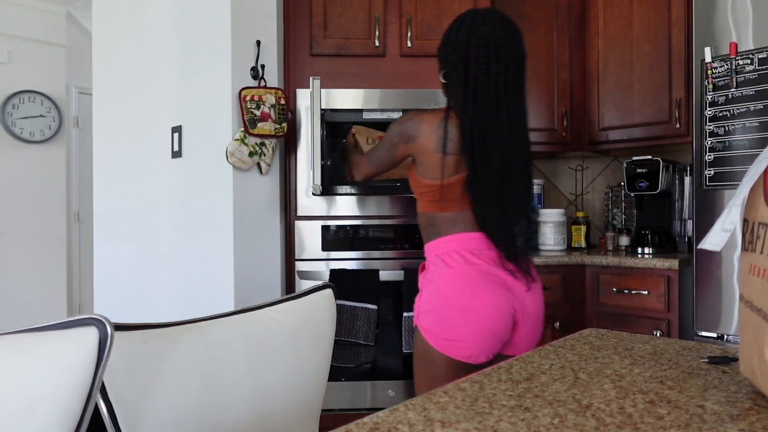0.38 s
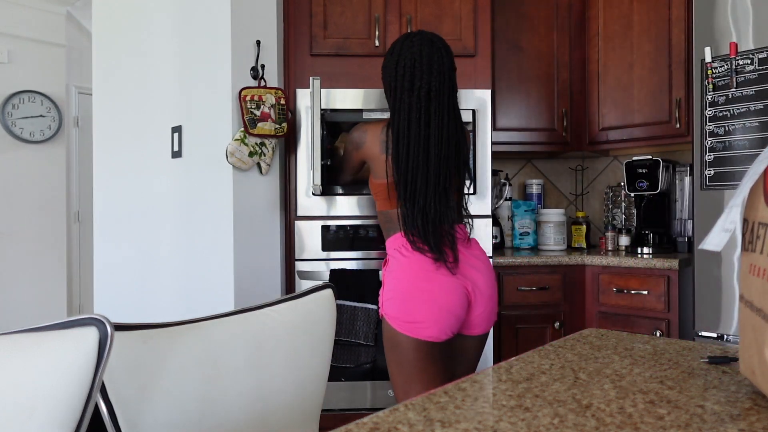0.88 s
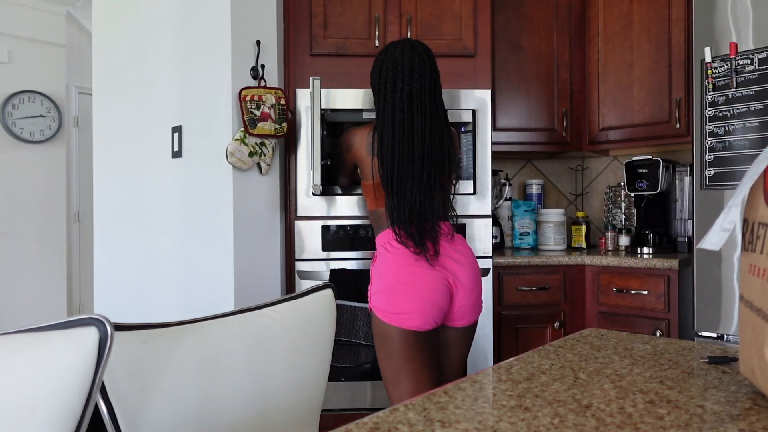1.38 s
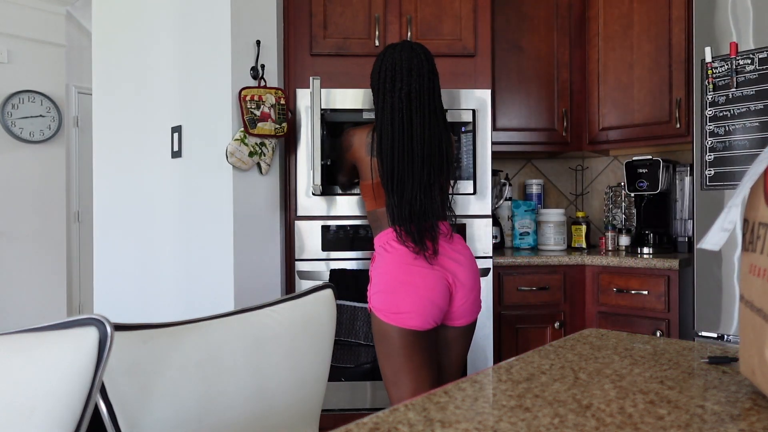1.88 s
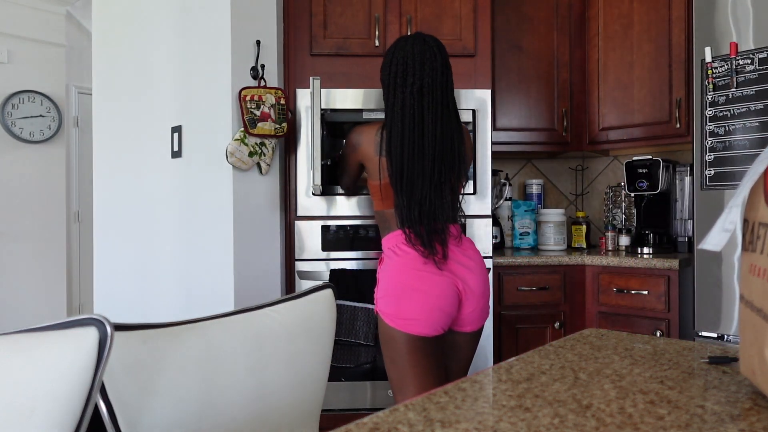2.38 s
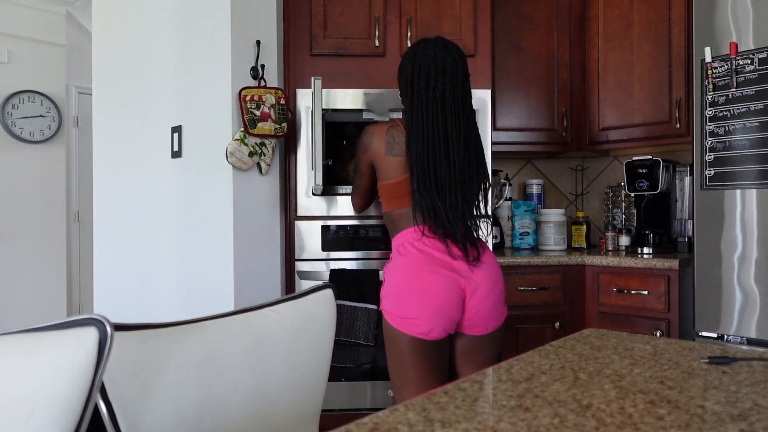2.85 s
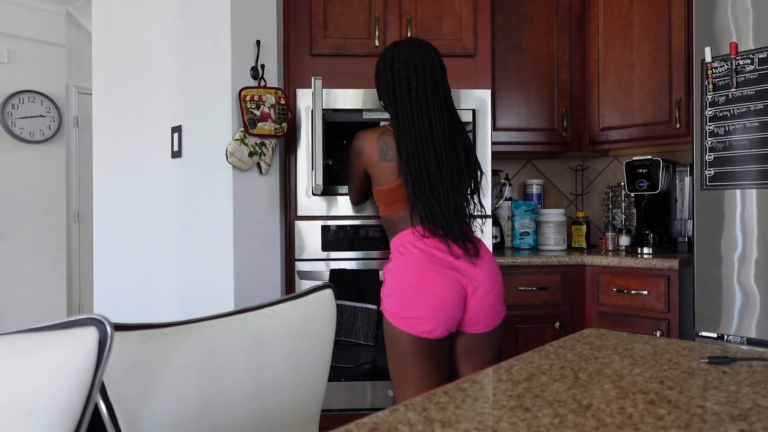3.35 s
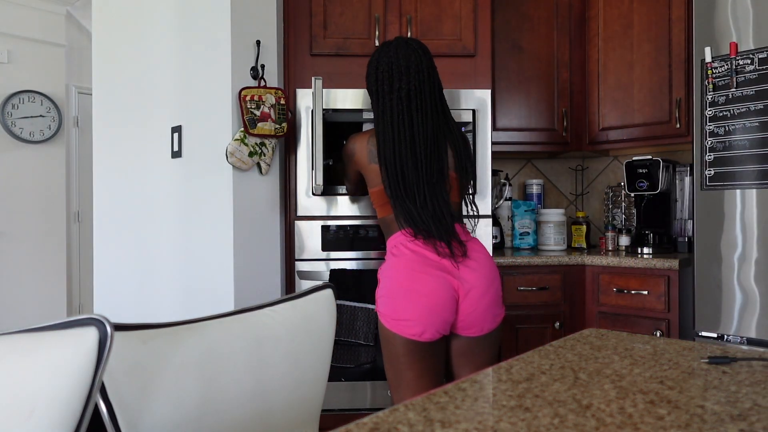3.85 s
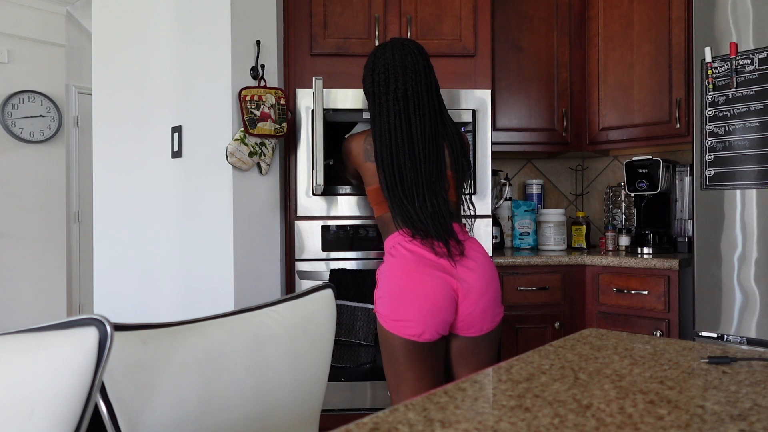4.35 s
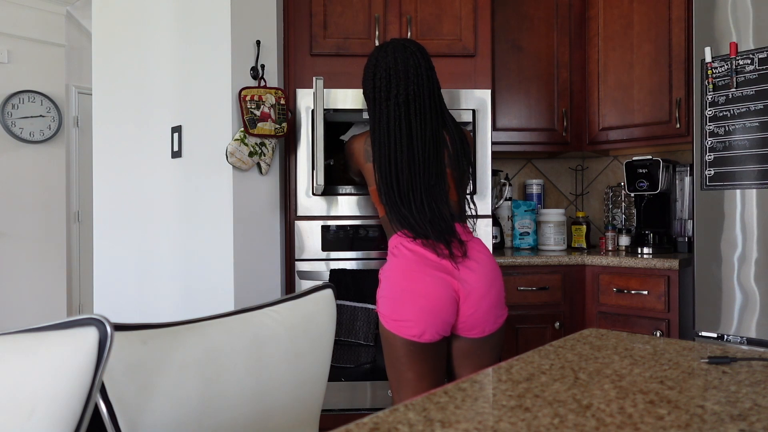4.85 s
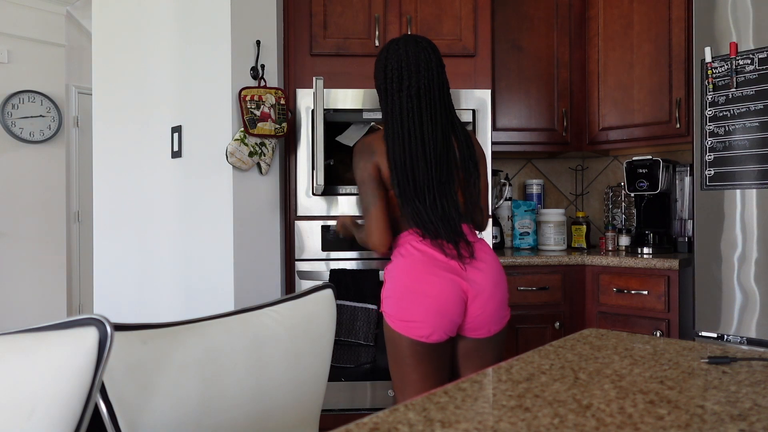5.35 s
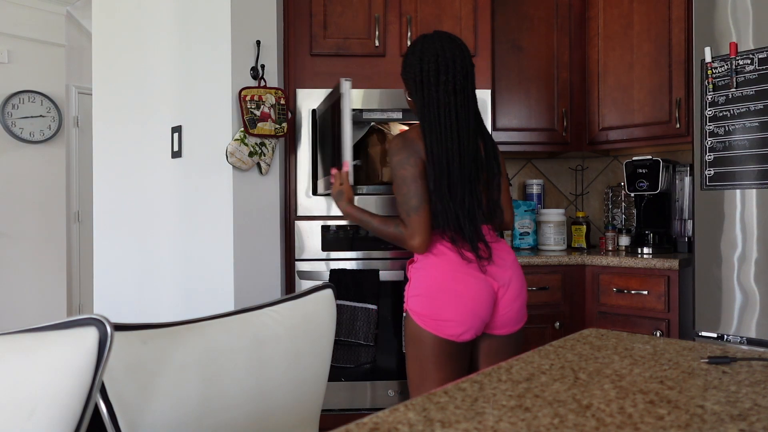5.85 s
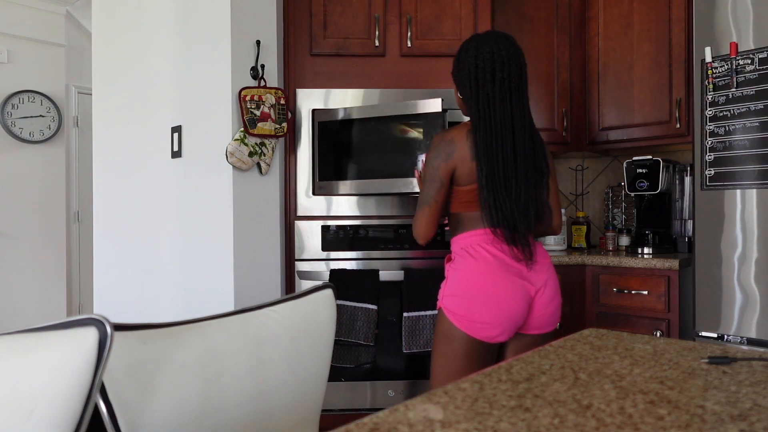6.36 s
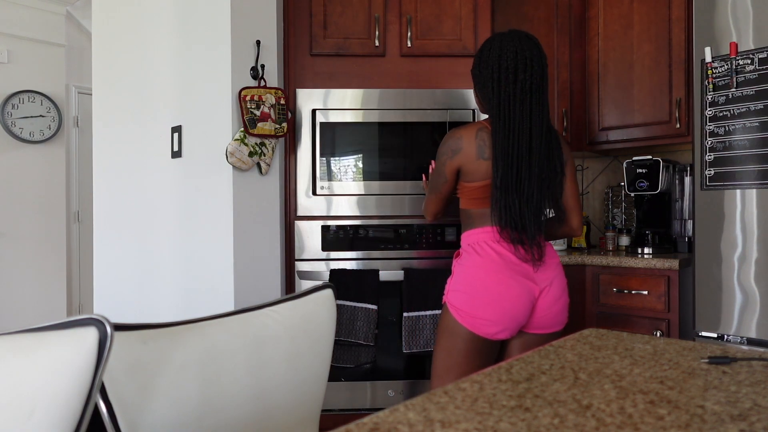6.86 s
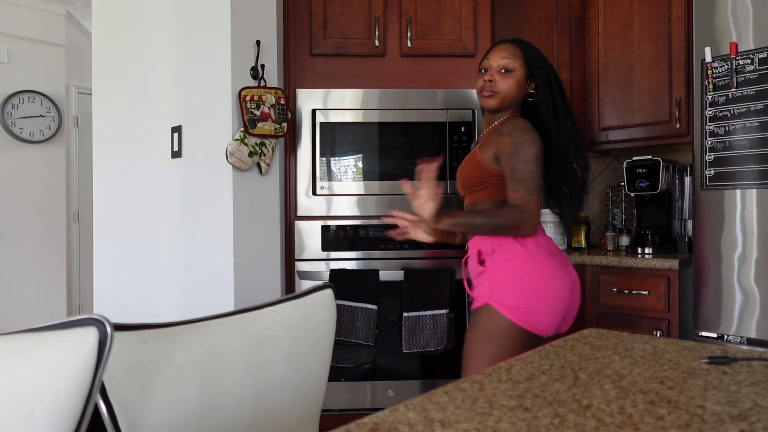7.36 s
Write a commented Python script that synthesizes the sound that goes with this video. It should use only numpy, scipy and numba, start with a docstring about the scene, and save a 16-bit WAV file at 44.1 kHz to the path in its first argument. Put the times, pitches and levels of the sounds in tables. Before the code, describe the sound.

In a hard, reverberant kitchen, paper bags and cartons are pushed about inside a microwave. Rustling and crackling come in uneven bursts, with dull cardboard pops and sharp crease snaps, loudest in the middle. The handling thins to small ticks, then nearly stops. The oven door slams and rattles briefly, its echo fading into soft room tone. Stereo microphone a few metres away.

```python
"""Long rustling and many snaps of creases: paper bags and cartons are pushed about inside a small oven.
The oven stands across a hard kitchen; near the end its door is slammed and rattles on.
Rustle, snaps and door are random clicks shaped in time and spectrum, over a steady room tone.
Decaying noise gives the answers of steel cavity and room; gain control holds down the loudest moments."""
import sys
import numpy as np
from scipy import signal
from scipy.fft import rfft, irfft, next_fast_len
from scipy.io import wavfile
from scipy.ndimage import uniform_filter1d, map_coordinates
from numba import njit

SR = 44100
rng = np.random.default_rng(int(sys.argv[2]) if len(sys.argv) > 2 else 0)


def gain_from_db(level_db):
    """Turn a decibel level (scalar or array-like) into a linear amplitude factor."""
    decades = np.asarray(level_db, float) / 20
    return 10 ** decades


def output_pcm(signal):
    """Save a mono or channel-first signal as 16-bit PCM at the path in sys.argv[1].

    Samples are clipped to [-1, 1] before scaling.
    """
    pcm = np.clip(np.atleast_2d(signal).T, -1, 1) * 32767
    wavfile.write(sys.argv[1], SR, np.round(pcm).astype(np.int16))


N = 329868

# Pushes of the hands on the paper. Each row: start in seconds, length in seconds, crease level in dB,
# hollow body in dB above crease, crisp edge in dB above crease.
HAND_PUSHES = [(0.0, 0.017, -22.5, -12, -8.5), (0.185, 0.24, -37, -1.5, -7.5), (0.502, 0.19, -44.5, 0, -4),
               (0.709, 0.28, -31, -2.5, -21), (0.84, 0.11, -28.5, -4.5, -8), (0.986, 0.18, -36, -1.5, -7),
               (1.264, 0.32, -40, 1.5, -6), (1.575, 0.74, -42.5, 0, -1.5), (1.82, .08, -40, -0.5, -6),
               (1.893, 0.23, -40.5, 2, -13), (2.064, 0.11, -30.5, 4, -9), (2.22, 0.11, -44.5, 9.5, -16),
               (2.604, 0.63, -52, -5, 0), (2.878, 0.21, -30, -0.5, -4), (3.114, 0.21, -35, 1, -10),
               (3.336, 0.1, -24, 0, -3), (3.496, 0.26, -35.5, -3, -5.5), (3.65, 0.17, -22.5, 1, -4.5),
               (3.88, 0.25, -35.5, -0.5, -3), (4.074, .14, -27.5, 4, -5), (4.234, 0.087, -27.5, 2, -11),
               (4.353, .2, -30.5, -0.5, -21), (4.662, 0.13, -35, 3.5, -10), (4.804, .13, -18.5, -4, -4.5),
               (4.923, 0.078, -25.5, 1, -14), (5.21, 0.13, -50, 8.5, -14), (5.4, .3, -53, -16, 0.5),
               (5.804, 0.096, -49.5, 9, -19)]
# Clearest snaps of a crease. Each row: start in seconds, level in dB before the layer offsets,
# panel pitch in Hz, edge in dB relative to that level, rise in ms.
CLEAR_SNAPS = [(.048, -25, 1390, -17, 11), (0.1782, -17, 1390, -15, 1.5), (.197, -18, 1184, -17, 4.5),
               (0.2305, -20.5, 1830, -17, 2.3), (0.2622, -17, 1250, -20, 1.1),
               (0.2784, -27, 1970, -21, 2.9), (0.3177, -21, 944, -26, 0.54), (0.3559, -21, 1800, -27, 2.1),
               (0.3808, -23, 2000, -17, 4.1), (0.421, -29, 1200, -20, 3.6), (0.4949, -27, 2050, -12, 2.3),
               (0.6303, -19.5, 1650, -24, 1.4), (.719, -32, 1880, -25, 1.2), (0.7384, -24, 1790, -28, 8.1),
               (.853, -9, 1280, -23, 1.6), (.8819, -12.5, 2000, -20, .6), (0.9164, -13, 2140, -23, 6.9),
               (0.9306, -12.5, 1780, -19, 1.5), (0.9784, -15.5, 2030, -18, 5.4),
               (1.0643, -28, 1760, -8, 12), (1.1129, -26, 1860, -11, 3.1), (1.265, -29, 2910, -13, 2.2),
               (1.2798, -23, 1900, -15, 3.4), (1.3335, -26.5, 1090, -13, 1.3), (1.379, -23, 1044, -12, 2.4),
               (1.4164, -25, 866, -26, 3.6), (1.4615, -24.5, 1050, -13.5, 3.2),
               (1.514, -21.5, 1920, -12, 1.5), (1.6763, -35, 1080, -9, 13), (1.7685, -33, 1570, -21, 1.8),
               (1.9196, -17, 1140, -12.5, 0.36), (1.9813, -25.5, 1070, -26, 3.3),
               (2.0494, -19, 880, -22, .8), (2.1007, -8.5, 2410, -13.5, 4.8), (2.1305, -12, 2200, -21, .9),
               (2.2322, -22.5, 1080, -15, 0.75), (2.273, -21.5, 1120, -21, 5.5),
               (2.2965, -21.5, 1730, -30, 2), (2.637, -39.5, 1710, -27, 2.2),
               (2.887, -22.5, 2070, -12.5, 4.9), (2.9262, -27, 1670, -21, 2.6),
               (2.9867, -18, 3080, -9, 0.96), (3.0574, -17, 1730, -17, 1.1), (3.0792, -15.5, 994, -17, 6.5),
               (3.1759, -20.5, 1910, -22, 7.4), (3.2617, -25, 1950, -20, 5.6), (3.328, -11, 2300, -15, .9),
               (3.3486, -11, 2930, -8, 3.6), (3.365, -16.5, 960, -10, 17), (3.4023, -12.5, 4060, -3.5, 8.5),
               (3.428, -7, 1560, -6, 1.5), (3.437, -13.5, 1020, -11, 7.1), (3.4615, -8.5, 1280, -21, 0.84),
               (3.646, -21, 2070, -9, 2.4), (3.6732, -7.5, 1040, -7, 1.3), (3.726, -10.5, 1900, -9, 1.5),
               (3.7369, -10, 3280, -10.5, 5.6), (3.7637, -6.5, 2750, -11, 7.3),
               (3.7897, -9.5, 1240, -15, 3), (3.9234, -10, 3060, -11, 4.5), (4.0735, -6.5, 523, -23, 2),
               (4.079, -13, 1470, -21, 1.8), (4.1153, -18, 2980, -10, 4.3), (4.1444, -7.5, 956, -18, 3.1),
               (4.224, -12, 1240, -14, 1.8), (4.25, -11, 2280, -22, 0.98), (4.2617, -17, 1610, -1.5, 1.3),
               (4.318, -15.5, 1290, -16, 1.4), (4.326, -12, 1100, -23, 1.4), (4.37, -15.5, 2090, -29, 2.1),
               (4.412, -25, 2440, -26, 1.7), (4.4253, -19.5, 1550, -15, 1), (4.467, -18.5, 1010, -20, 1.1),
               (4.484, -13.5, 4260, -11, 4.2), (4.495, -8, 2910, -8, 6.3), (4.6153, -16, 1960, -19, .9),
               (4.669, -22, 980, -26, 1.5), (4.687, -19.5, 1900, -12, 1.8), (4.7607, -17, 1250, -12, 24),
               (4.789, -4.5, 2100, -6.5, 1.1), (4.8162, -19, 3400, -7, 1.5),
               (4.8582, -4.5, 1900, -5.5, 1.2), (4.9374, -27, 2000, -3, 3.7), (4.958, -18.5, 3180, 0, 11),
               (5.2155, -18, 1145, -34, 1.2), (5.221, -24, 1150, -26, 3), (5.382, -17, 936, -6.5, 1.4),
               (5.386, -10.5, 1940, -10.5, 0.29), (5.4027, -25.5, 1540, -6, 2.6),
               (5.5964, -36, 4180, -5, 4.3), (5.741, -26, 3860, -1.5, 2.1), (5.7479, -27, 4670, 0, 1.1),
               (5.806, -30, 880, -7, 11), (5.8539, -32, 850, -14, 5.7), (5.984, -48, 4470, -16, .9),
               (6.4419, -37.5, 4070, -6, 5.9)]
# Door meets frame, latch and rack rattle. Each row: start in seconds, rattle peak in dB,
# thump in dB above rattle.
DOOR_STRIKES = [(6.657, -13.5, -23), (6.675, -18, -28), (6.693, -16, -14), (6.703, -26, -25),
                (6.73, -13, -35), (6.747, -13, -13), (6.766, -15.5, -24), (6.789, -17.5, -8.5),
                (6.837, -18.5, -15)]
# Relative spectra of the creasing sheet, its hollow body and its crisp edge, of the door's rattle and thump,
# and of the room tone. Each row: frequency in Hz, power density in dB per Hz.
CREASE_SPECTRUM = [(590, -42), (1000, -4), (1630, -5.5), (1910, 5.5), (2570, 2.5), (2970, 3.5), (3690, 2.5),
                   (7500, -15.5), (9750, -31), (16500, -120)]
BODY_SPECTRUM = [(35, -84), (60, -42), (264, -8.5), (306, -11.5), (401, -9.5), (490, -5), (669, -4.5),
                 (924, 1), (1500, 0), (1950, -6), (3300, -120)]
EDGE_SPECTRUM = [(1200, -70), (2900, -12), (5000, 9), (7200, 7.5), (10000, -1), (13800, -7.5),
                 (15500, -11.5)]
RATTLE_SPECTRUM = [(240, -41), (400, -10), (512, 3), (697, 0), (1030, 5.5), (1400, 3.5), (1600, 3.5),
                   (3210, -1.5), (4380, 0.5), (12100, -23.5), (16000, -35)]
THUMP_SPECTRUM = [(18, -66), (30, -27), (96, -20), (237, 1), (290, 1.5), (325, 3), (600, -15), (780, -33),
                  (1320, -120)]
AIR_SPECTRUM = [(18, -70), (30, -27.5), (245, -9.5), (336, -11.5), (666, -5.5), (1070, -4.5), (1220, -2.5),
                (1720, -1), (1960, -2), (2290, -5.5), (4420, -7.5), (14800, -20.5), (16000, -55)]
# Kitchen decay before the scale of each space. Each row: frequency in Hz, time to fall 60 dB in seconds.
KITCHEN_DECAY = [(150, 0.84), (400, 0.69), (1000, 0.75), (2800, 0.63), (7000, 0.57), (14000, 0.55)]
# Balance of the two channels. Each row: frequency in Hz, left over right in dB.
CHANNEL_BALANCE = [(100, 0.5), (250, -0.7), (500, -2), (4400, -2), (8000, -2.5), (10000, -0.5), (11500, -1)]


def rustle():
    """Dense crackling: many small creases yield in clumps, and patches of the sheet change colour in time."""
    clump_db, clumps_per_s, patch_db = 1.65, 70, 1.5
    t = np.arange(N) / SR
    clumps = gain_from_db(clump_db * map_coordinates(rng.standard_normal(600), [t * clumps_per_s]))
    clicks = clumps * crackle(7000, spread_db=3.0, size=N)
    spectrogram = signal.stft(clicks, nperseg=256)[2]
    patches = uniform_filter1d(rng.standard_normal(spectrogram.shape), size=5, axis=0)
    patches = uniform_filter1d(patches, size=9, axis=1)
    patchy = signal.istft(spectrogram * gain_from_db(patch_db * unit(patches)), nperseg=256)[1]
    sheet = unit(patchy[:N])
    crease_gain, body_gain, edge_gain = gain_from_db(pressure_db())
    crease = coloured(crease_gain * sheet, CREASE_SPECTRUM)
    body = coloured(body_gain * sheet, BODY_SPECTRUM)
    return crease + body + coloured(edge_gain * sheet, EDGE_SPECTRUM)


def pressure_db():
    """Powers of overlapping pushes add: each rises, sags while it lasts, then lets go."""
    attack_s, sag_db_per_s, release_db_per_s = 0.0065, 8.5, 172  # the release adds to the sag
    hop = 32  # samples
    start, length, db, body_db, edge_db = np.transpose(HAND_PUSHES)[:, :, None]
    t = np.arange(0, N, hop) / SR - start
    fall_db = sag_db_per_s * np.maximum(t, 0) + release_db_per_s * np.maximum(t - length, 0)
    shape = np.clip(t / attack_s, 0, 1) ** 2 * gain_from_db(-2 * fall_db)  # power
    power = [np.sum(shape * gain_from_db(2 * (db + above)), axis=0) for above in (0, body_db, edge_db)]
    return 10 * np.log10(np.repeat(power, hop, axis=1)[:, :N] + 1e-12)


def snaps():
    """Impulsive buckling: each snap is a swarm of clicks, part of it resonating at its panel's broad pitch."""
    s, db, hz, edge_db, rise_ms = np.hstack([np.transpose(CLEAR_SNAPS), small_snaps()])
    body_db = -7 - 2 * np.log2(hz / 1500)  # higher panels are less hollow
    panels = np.zeros(N + SR)
    for start, level_db, panel_hz, ms in zip(s, db, hz, rise_ms):
        cycles = panel_hz * np.arange(SR // 40) / SR
        ring = np.sin(2 * np.pi * cycles) * cycles ** 2 * gain_from_db(-60 * cycles / 9.5)
        ring = ring / np.linalg.norm(ring)
        clicks = swarm(level_db - 6.0, ms, t60=0.018, per_s=3500)
        sound = signal.fftconvolve(clicks, ring)
        panels[round(start * SR):][:len(sound)] += sound
    crease = coloured(bursts(s, db - 5.0, rise_ms, t60=0.052, per_s=9800), CREASE_SPECTRUM)
    body = coloured(bursts(s, db + body_db, rise_ms, t60=0.033, per_s=3700), BODY_SPECTRUM)
    edge = coloured(bursts(s, db + edge_db, rise_ms, t60=0.034, per_s=5000), EDGE_SPECTRUM)
    return panels[:N] + crease + body + edge


def small_snaps(count=60):
    """Lesser buckling at random moments, its strength following the push under it."""
    s, z = rng.uniform(0, N / SR, count), rng.standard_normal((count, 4))
    rustle_db = pressure_db()[0, (s * SR).astype(int)]
    db = rustle_db + 8.5 + 3 * z[:, 0]
    panel_hz = 1642 * np.exp(0.358 * z[:, 1])
    edge_db = -19.5 + 5 * z[:, 2]
    rise_ms = 1.8 * np.exp(0.67 * z[:, 3])
    return np.array([s, db, panel_hz, edge_db, rise_ms])


def door():
    """Repeated impact: the door strikes its frame; panel, latch and rack chatter on for a moment."""
    s, db, thump_db = np.transpose(DOOR_STRIKES)
    rise_ms = np.full(len(s), 1.3)
    rattle = bursts(s, db, rise_ms, t60=0.29, per_s=13000)
    thump = bursts(s, db + thump_db, rise_ms, t60=0.29, per_s=3600)
    return coloured(rattle, RATTLE_SPECTRUM) + coloured(thump, THUMP_SPECTRUM)


def bursts(times, dbs, rises_ms, t60, per_s):
    """Superposition: one swarm of clicks starts at each time."""
    out = np.zeros(N + SR)
    for s, db, rise_ms in zip(times, dbs, rises_ms):
        out[round(s * SR):][:SR // 8] += swarm(db, rise_ms, t60, per_s)
    return out[:N]


def swarm(db, rise_ms, t60, per_s):
    """Exponential growth and decay of an eighth-second swarm; a slow swell also dies slowly."""
    t = np.arange(SR // 8) / SR
    rise = max(abs(rise_ms), .1) / 1000  # seconds
    shape = (1 - np.exp(-2 * t / rise)) * gain_from_db(-60 * t / (t60 + 5 * rise))
    return gain_from_db(db) * shape / shape.max() * crackle(per_s, spread_db=1.8, size=len(t))


def crackle(per_s, spread_db, size):
    """Random impulses of rms 1, their dB sizes exponentially spread so that a few are far larger."""
    chance, sign, strength = rng.random((3, size))
    sizes = gain_from_db(-spread_db * np.log(1 - strength * .999))
    return unit((chance < per_s / SR) * np.sign(sign - .5) * sizes)


def kitchen(x):
    """Reverberation of two spaces: the steel cavity answers fast, the room slowly."""
    cavity = answer(x, level_db=-4.5, delay_s=.002, alike=.98, t60_scale=.2, seconds=.16, count=200)
    room = answer(x, level_db=-6.0, delay_s=.012, alike=0.96, t60_scale=1.13, seconds=.7, count=240)
    return cavity + room


def answer(x, level_db, delay_s, alike, t60_scale, seconds, count):
    """Convolution with a diffuse echo, new for each of count cross-faded slices so that no fixed tone rings."""
    step = N // count + 1
    out, fade = np.zeros((2, N + 3 * SR)), np.sqrt(np.hanning(2 * step))
    x = np.pad(x, (step, 2 * step))
    shares = np.sqrt([[(1 + alike) / 2], [abs(1 - alike) / 2]])  # alike: correlation of the channels
    for k in range(0, N + step, step):
        mid, side = tail(t60_scale, seconds) * shares
        pair = gain_from_db(level_db) * np.array([mid + side, mid - side])
        echo = signal.fftconvolve((fade * x[k:k + 2 * step])[None], pair, axes=1)
        out[:, k + round(delay_s * SR):][:, :echo.shape[1]] += echo
    return out[:, step:step + N]


def tail(t60_scale, seconds):
    """A diffuse field as decaying noise of about unit energy, each frequency dying at its own speed."""
    hz, t, z = signal.stft(rng.standard_normal((2, int(seconds * SR))), SR, nperseg=256)
    t60 = t60_scale * along(KITCHEN_DECAY, hz)[:, None]
    pair = signal.istft(z * gain_from_db(-60 * t / t60), SR, nperseg=256)[1]
    return pair / np.linalg.norm(pair[0])


def room_tone():
    """Stationary filtered noise: appliance hum and air, largely shared by the two channels."""
    mid, side = coloured(rng.standard_normal((2, N)), AIR_SPECTRUM)
    return gain_from_db(-45.5) * np.array([mid + 0.42 * side, mid - 0.29 * side])


def unit(x):
    """Normalisation of x to rms 1."""
    return x / np.sqrt(np.mean(x ** 2) + 1e-20)


def along(points, hz):
    """Interpolation of (Hz, value) points on a logarithmic frequency axis."""
    f, v = np.transpose(points)
    return np.interp(np.log(hz + 1), np.log(f + 1), v)


def coloured(x, spectrum):
    """Minimum-phase filtering: a causal pulse of unit energy with the given spectrum."""
    size = 4096
    gain = np.maximum(gain_from_db(along(spectrum, np.fft.rfftfreq(size, 1 / SR))), 1e-3)
    cepstrum = irfft(np.log(gain))
    cepstrum[1:size // 2] *= 2  # folding the cepstrum makes the pulse causal
    cepstrum[size // 2 + 1:] = 0
    pulse = irfft(np.exp(rfft(cepstrum)))
    pulse = pulse / np.linalg.norm(pulse)
    return signal.fftconvolve(x, pulse.reshape((1,) * (x.ndim - 1) + (-1,)), axes=-1)[..., :N]


def scene():
    """Superposition of direct sound, echoes and room tone."""
    near = rustle() + snaps() + door()
    return near + kitchen(near) + room_tone()


@njit
def follow(level, fall):
    """Peak holding: rises at once with the level, sinks exponentially."""
    out = level.copy()
    for k in range(1, len(out)):
        out[k] = max(out[k], out[k - 1] * fall)
    return out


def top_cut(x):
    """Nothing passes above the cut-off."""
    return signal.sosfilt(signal.butter(12, 16510, fs=SR, output="sos"), x)


def record(dry):
    """Compression above a threshold, soft limiting of peaks, then channel balance and band limits."""
    threshold_db, release_db_per_s, low_hz, top_hz = -21.0, 45, 62, 15850
    level = np.sqrt(np.abs(uniform_filter1d(np.mean(dry ** 2, axis=0), size=220)))  # 5 ms rms
    held = follow(level, gain_from_db(-release_db_per_s / SR))
    gain = np.maximum(held / gain_from_db(threshold_db), 1) ** -.5  # halves the excess in dB
    x = dry * uniform_filter1d(gain, size=132)
    x = x / (1 + np.abs(x / .62) ** 5) ** (1 / 5)  # peaks round off below 0.62
    size = next_fast_len(N)
    hz = np.fft.rfftfreq(size, 1 / SR)
    half_db = along(CHANNEL_BALANCE, hz) / 2
    band = (hz < top_hz) * (1j * hz / (low_hz + 1j * hz)) ** 2  # two first-order bass cuts
    mix = irfft(rfft(x, size) * band * gain_from_db([half_db, -half_db]), size)[:, :N]
    return top_cut(mix)


dry = scene()
out = record(dry)
output_pcm(out)
```